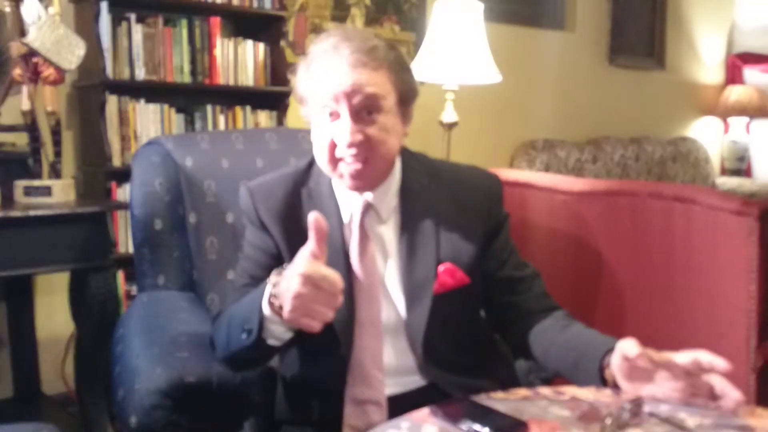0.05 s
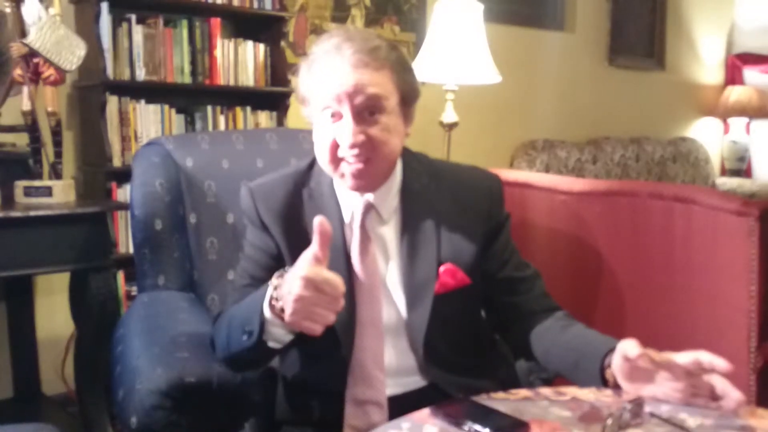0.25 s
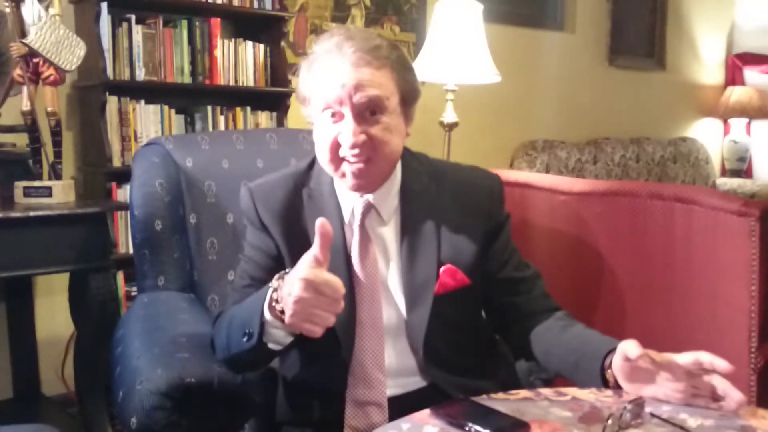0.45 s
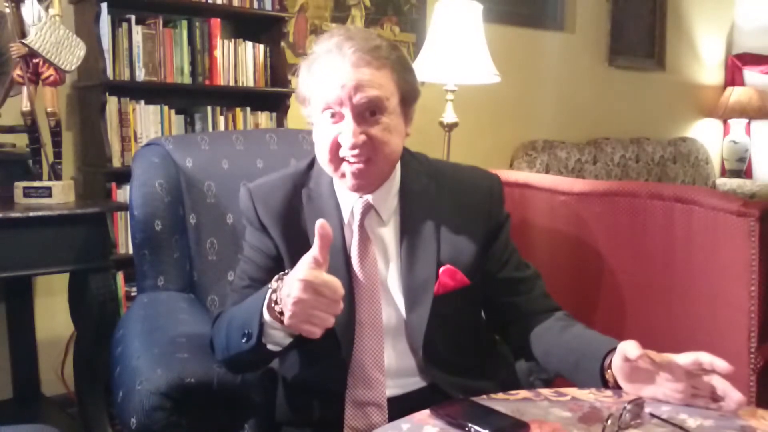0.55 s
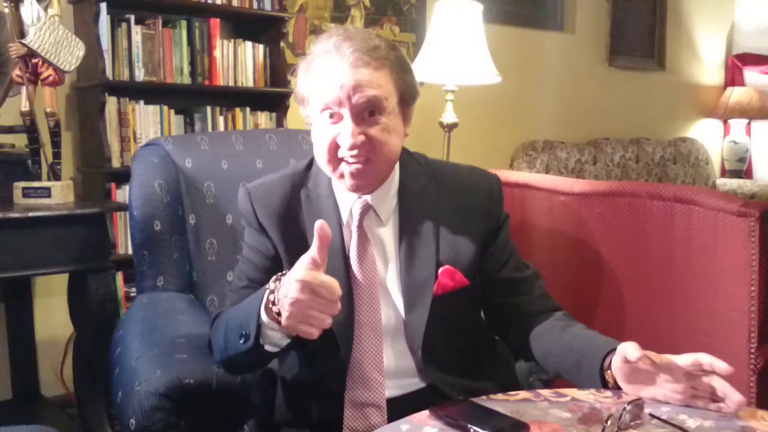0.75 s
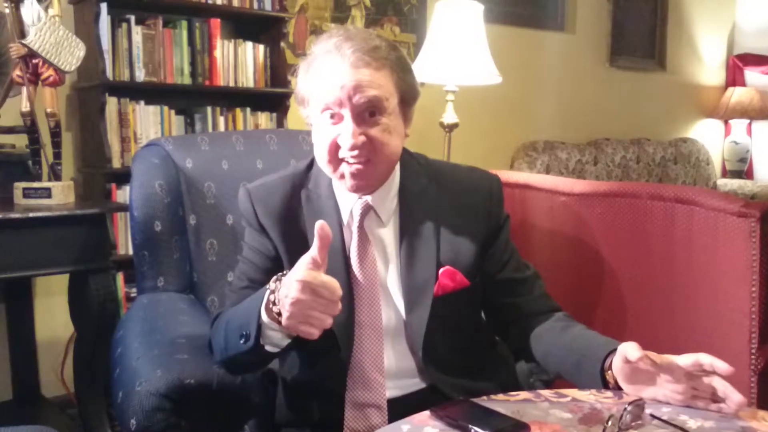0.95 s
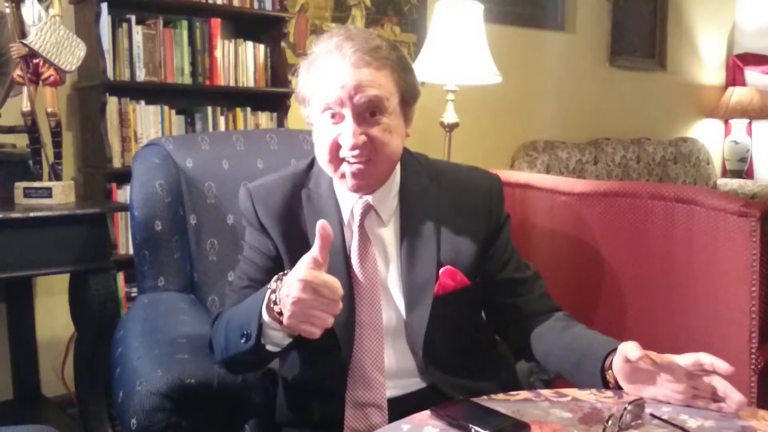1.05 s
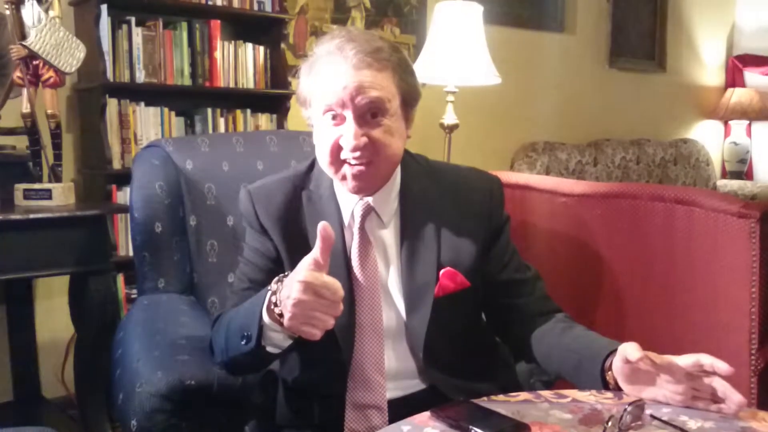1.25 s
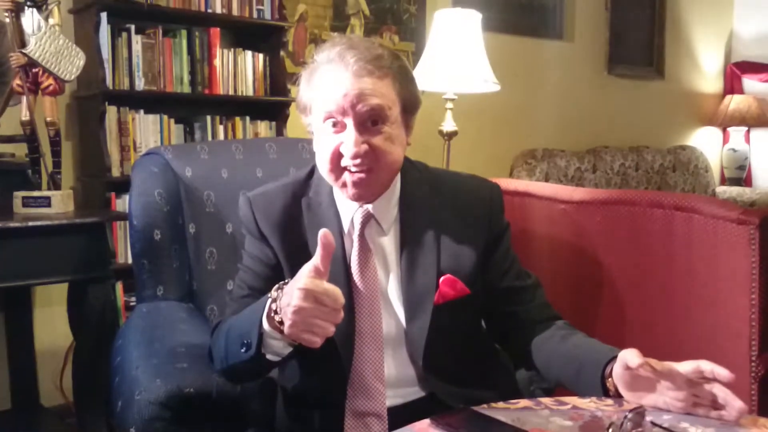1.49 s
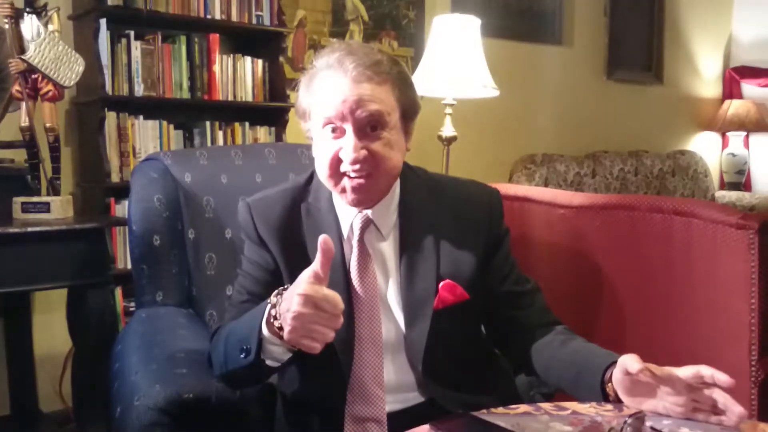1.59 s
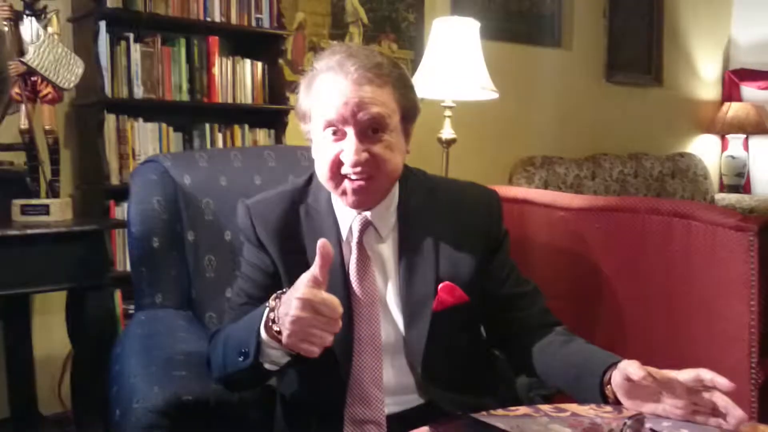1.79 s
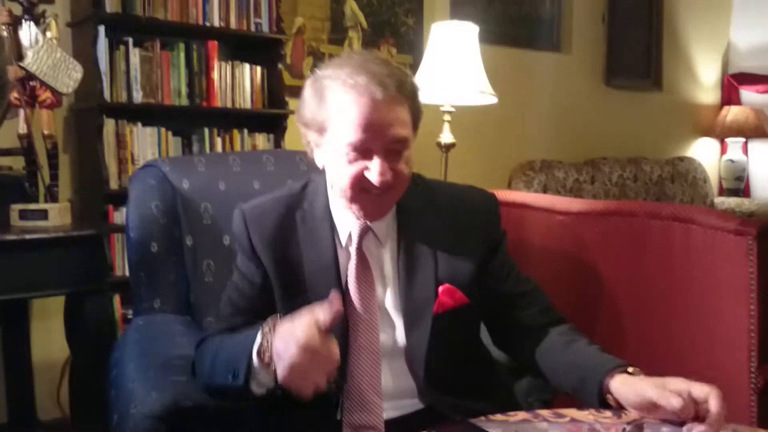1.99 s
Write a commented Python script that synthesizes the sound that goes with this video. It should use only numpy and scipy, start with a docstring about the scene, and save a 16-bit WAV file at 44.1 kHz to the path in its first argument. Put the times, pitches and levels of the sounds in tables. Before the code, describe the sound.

A mobile phone vibrates twice on a cloth-covered table after a moment of quiet room hiss. Each short buzz is a deep hum with a fine rattle, spinning up and winding down, heard very close.

```python
"""A phone's vibration motor buzzes twice on a cloth-covered table, heard from right at the case.
Its off-centre weight is a rotating unbalance that spins up and coasts down. It forces a deep hum,
mostly on the left, and a rattle of two knocks a turn, mostly on the right, whose overtones glide with
the speed. The case chafes as it shakes and clicks at starts and stops. Underneath lie a low throb,
a rumble and the hiss of a quiet room, with a faint rustle and two ticks before the first buzz."""
import sys
import numpy as np
from scipy import signal
from scipy.fft import rfft, irfft, next_fast_len
from scipy.io import wavfile
from scipy.ndimage import map_coordinates

SR = 44100
rng = np.random.default_rng(int(sys.argv[2]) if len(sys.argv) > 2 else 0)


def unload_wav(signal):
    """Save mono or channel-first audio to the path in sys.argv[1] as 16-bit WAV at rate SR, clipped to [-1, 1]."""
    wavfile.write(
        sys.argv[1],
        SR,
        np.round(np.clip(np.atleast_2d(signal).T, -1, 1) * 32767).astype(np.int16),
    )


N = 89478
CREEP_HZ = 8.6  # slow rise of the rotation rate, on top of the quick spin-up
FULL_SPEED_HZ = 169 + CREEP_HZ


def amp(db):
    """The decibel scale: amplitude grows tenfold every 20 dB."""
    return 10 ** (np.asarray(db) / 20)


def unit(x):
    """Normalisation to an rms of 1."""
    return x / np.sqrt(np.mean(x ** 2) + 1e-20)


def along(points, hz):
    """Interpolation of (frequency [Hz], value) points on a logarithmic frequency axis."""
    knots, values = np.transpose(points)
    return np.interp(np.log(hz + 1), np.log(knots + 1), values)


def curves(rows):
    """Linear interpolation in time: one value per sample for each column after the first."""
    times, *columns = np.transpose(rows)
    return [np.interp(np.arange(N) / SR, times, column) for column in columns]


def filtered(x, response):
    """Linear filtering: the spectrum of x is multiplied by a frequency response."""
    size = next_fast_len(N + 8192)
    return irfft(rfft(x, size) * response(np.fft.rfftfreq(size, 1 / SR)), size)[..., :N]


def noise(spectrum):
    """Spectral shaping turns white noise into coloured noise of rms 1."""
    return unit(filtered(rng.standard_normal(N), lambda hz: amp(along(spectrum, hz))))


def shaped(x, spectrum, size=4096):
    """Minimum-phase filtering: the overtones of x are weighted by this magnitude spectrum."""
    cepstrum = irfft(np.log(amp(along(spectrum, np.fft.rfftfreq(size, 1 / SR)))))
    cepstrum[1:size // 2] *= 2  # folding the cepstrum makes the filter causal
    cepstrum[size // 2 + 1:] = 0
    kernel = irfft(np.exp(rfft(cepstrum)))
    return signal.fftconvolve(x, kernel)[:N]


def pulses(times, sizes, half_width=8):
    """Band-limited impulses: a windowed sinc lets each fall between samples."""
    at = times[:, None] * SR
    index = at.astype(int) + np.arange(1 - half_width, half_width + 1)
    shape = np.sinc(index - at) * np.cos(np.pi * (index - at) / (2 * half_width)) ** 2
    return np.bincount(np.clip(index, 0, N).ravel(), (sizes[:, None] * shape).ravel(), N + 1)[:N]


def snaps(rows, t60, octaves, size=2048):
    """Damped transients: noise bursts, each around its own pitch, fall 60 dB in t60 seconds."""
    out, t, hz = np.zeros(N + size), np.arange(size) / SR, np.fft.rfftfreq(size, 1 / SR)
    attack = 1 - np.exp(-t / .0003)
    for start, db, centre in rows:
        colour = 1 / (1 + (hz / centre) ** 8) / (1 + (np.log2((hz + 1) / centre) / octaves) ** 2)
        burst = unit(irfft(rfft(rng.standard_normal(size)) * colour))
        out[round(start * SR):][:size] += amp(db - 60 * t / t60) * burst * attack / 2
    return out[:N]


def room(x, t60=.18):
    """Reverberation: a diffuse tail decays exponentially on each side."""
    t = np.arange(SR // 3) / SR
    tail = rng.standard_normal((2, len(t))) * amp(-60 * t / t60)
    return signal.fftconvolve(x[None], tail / np.linalg.norm(tail[0]), axes=1)[:, :N]


def hiss():
    """The room's noise floor: stationary noise, uncorrelated between the sides."""
    # noise spectrum on each side (frequency [Hz], relative density [dB])
    left = [(20, -12), (45, -25), (68, 7.5), (110, -13.5), (300, -9), (650, -6.5), (1900, -8),
            (3000, -13.5), (4700, -20), (7300, -12.5), (11200, -25), (15000, -22)]
    right = [(20, -3), (45, -2.5), (68, 6.5), (110, -8), (300, -5.5), (650, -3), (1900, -2.5), (3800, -7),
             (4700, -16.5), (7300, -15), (11200, -26), (15000, -20.5)]
    # rms levels (left [dB], right [dB])
    levels = [-63.5, -58.5]
    return np.array([amp(db) * noise(colour) for db, colour in zip(levels, (left, right))])


def rustle(centre_s=.36, width_s=.07, peak_db=-68.5):
    """Narrow-band noise swells and fades under a Gaussian envelope."""
    # noise band (frequency [Hz], relative density [dB])
    band = [(1500, -33), (1950, 3), (2500, -33)]
    swell = np.exp(-((np.arange(N) / SR - centre_s) / width_s) ** 2)
    return amp(peak_db) * swell * noise(band)


def ticks():
    """Two faint ticks, each a direct sound followed by its reverberation."""
    # transients in the room (time [s], level [dB], ring frequency [Hz])
    events = [(.1513, -43, 9400), (.1758, -46, 13900)]
    direct = snaps(events, t60=.012, octaves=1.4)
    return direct + amp(3) * room(direct)


def rumble(speed, fade_s=.45, sides_db=(-49.5, -44.5)):
    """Leaky integration: low noise builds up with the shaking and lingers after it."""
    # rumble spectrum (frequency [Hz], relative density [dB])
    spectrum = [(20, -36), (45, -5), (65, 12), (95, -5.5), (230, -9.5), (700, -17), (1100, -30.5),
                (4000, -26.5), (7000, -55)]
    pole = np.exp(-1 / (fade_s * SR))
    shaking = signal.lfilter([1 - pole], [1, -pole], speed)
    return np.array([amp(db) * shaking * noise(spectrum) for db in sides_db])


def throb(right_db=-12.5):
    """Amplitude and frequency modulation: a low tone swells and drifts, the sides in antiphase."""
    # course of the tone on the left (time [s], frequency [Hz], level [dB])
    course = [(1.11, 52, -64), (1.137, 52.3, -26.5), (1.16, 50.3, -33), (1.19, 45.9, -42.5),
              (1.35, 46.4, -34.5), (1.5, 47.2, -42.5), (1.61, 48.2, -39.5), (1.66, 50.38, -32),
              (1.71, 50.1, -58)]
    hz, level_db = curves(course)
    t = np.arange(N) / SR
    sounding = (t > course[0][0]) & (t < course[-1][0])
    tone = np.sqrt(2) * amp(level_db) * sounding * np.sin(2 * np.pi * np.cumsum(hz) / SR)
    return np.array([tone, -amp(right_db) * tone])


def clicks(left_db=-17):
    """Transient excitation: the case clicks as the weight starts and stops."""
    # clicks on the right (time [s], level [dB], ring frequency [Hz])
    events = [(.9572, -33, 2600), (1.3772, -34, 2800), (1.5462, -41, 3500), (1.5700, -31, 4800),
              (1.9412, -33, 5500), (1.9754, -25.5, 3800)]
    right = snaps(events, t60=.010, octaves=1.0)
    return np.array([amp(left_db) * right, right])


def chafe(turns, speed, depth=.22, sides_db=(-68, -58)):
    """Friction noise of the case, modulated once a turn and strongest somewhat below full speed."""
    # friction spectrum (frequency [Hz], relative density [dB])
    spectrum = [(200, -10), (450, -4), (750, 0), (1100, -6), (1900, 0), (3800, -2), (5000, -7), (8500, -12),
                (12000, -14), (15500, -20)]
    looseness = amp(16 * (1.5 - speed ** 4))
    stroke = looseness * speed ** 2.2 * (1 + depth * np.cos(2 * np.pi * turns))
    return np.array([amp(db) * stroke * noise(spectrum) for db in sides_db])


def disperse(x, spread_s=.0008, band_hz=450):
    """Dispersion: each band of a knock crosses the case with its own group delay."""
    knots = np.arange(0, SR / 2 + band_hz, band_hz)
    delay = spread_s * rng.standard_normal(len(knots))
    return filtered(x, lambda hz: np.exp(-2j * np.pi * np.cumsum(np.interp(hz, knots, delay)) * hz[1]))


def knocks(turns, speed, offset, level_db=-1, scatter_db=.2):
    """An impact train, one knock a turn, timed as at full speed; its jitter grows at lower speeds."""
    turn = np.arange(1, int(turns[-1]) + 1) + offset
    slack = 1 - np.interp(turn, turns, speed)
    lateness, strength = rng.standard_normal((len(turn), 2)).T
    jitter_s = 1e-6 + 1e-4 * slack ** 2
    return pulses(turn / FULL_SPEED_HZ + jitter_s * lateness, amp(level_db + scatter_db * strength))


def brighten(x):
    """Time-varying equalisation: the treble is duller in the first buzz than in the second."""
    # gain at the peak of the treble band (time [s], level [dB])
    gain = [(1.05, -4.5), (1.29, -1), (1.65, 0.5), (1.88, 0.5)]
    # shape of that band (frequency [Hz], share [0-1])
    band = [(3800, 0.1), (4400, 1), (8200, 0.23), (10000, 0)]
    level_db, = curves(gain)
    return x + (amp(level_db) - 1) * filtered(x, lambda hz: along(band, hz))


def rattle(turns, speed, return_turn=.59):
    """Periodic impacts, two a turn, form a harmonic series that glides with the motor's speed."""
    # overtone strengths on each side at full speed (frequency [Hz], relative level [dB])
    overtones_left = [(170, -28), (360, -4.5), (710, -21.5), (1070, -21), (1240, -19.5), (1420, -21),
                      (1600, -45), (1950, -12), (2130, -27), (2660, -28), (2840, -19), (3910, -48),
                      (4080, -31), (4260, -52), (4620, -17), (4970, -35), (5150, -37), (6220, -14),
                      (7460, -15), (8350, -22.5), (15810, -44)]
    overtones_right = [(170, -23.5), (360, -12), (530, -8.5), (710, -2.5), (890, -7.5), (1070, -5.5),
                       (1240, -15), (1420, 0), (1600, 3), (1780, -2.5), (1950, 5.5), (2310, -0.5),
                       (2490, -12.5), (2660, -13.5), (2840, 0.5), (3200, -6.5), (3730, -2), (4440, -8.5),
                       (4800, -14), (4970, -3.5), (5150, -13), (5680, -13), (6040, -6), (6220, -8.5),
                       (7460, -14.5), (7810, -29), (8170, -11), (8880, -34), (9410, -22), (9770, -35),
                       (10480, -13.5), (10830, -34), (11010, -8.5), (11370, -31), (11720, -14.5),
                       (12610, -25), (12790, -17.5), (14740, -34), (15810, -28)]
    # the brighter return knock relative to the first knock (frequency [Hz], gain [dB])
    return_colour = [(300, -8), (2200, -8), (3000, 1), (4300, 1), (5200, -8), (11000, -12)]
    back = filtered(knocks(turns, speed, return_turn), lambda hz: amp(along(return_colour, hz)))
    blows = disperse(knocks(turns, speed, 0) + back)
    place = turns * SR / FULL_SPEED_HZ  # the whole waveform stretches as the motor slows
    sides = [map_coordinates(shaped(blows, overtones), [place], order=5)
             for overtones in (overtones_left, overtones_right)]
    return speed ** 3.87 * np.array(sides)


def hum(turns, speed, right_db=-22):
    """Forced vibration: the unbalance swings the whole phone once a turn, the sides in antiphase."""
    # hum on the left, as it would be at full speed (time [s], level [dB])
    envelope = [(.96, -30.5), (1.0, -27), (1.05, -24), (1.1, -21), (1.2, -18), (1.29, -16), (1.6, -18.5),
                (1.7, -16.5), (1.8, -15), (1.9, -14.5)]
    level_db, = curves(envelope)
    swing = np.sqrt(2) * amp(level_db) * speed ** 2.81 * np.cos(2 * np.pi * turns)
    return np.array([swing, -amp(right_db) * swing])


def motor(spin_up_s=.024, creep_s=.11, coast_s=.05):
    """Exponential relaxation of the rotation rate [Hz]: a quick spin-up, a slow creep, then coasting."""
    # drive pulses (time on [s], time off [s], rate the quick spin-up tends to [Hz])
    buzzes = [(.957, 1.297, 169), (1.557, 1.897, 168.65)]
    t, rate = np.arange(N) / SR, np.zeros(N)
    for on, off, quick_hz in buzzes:
        driven_s = np.clip(t, on, off) - on
        spin_up = quick_hz * (1 - np.exp(-driven_s / spin_up_s))
        creep = CREEP_HZ * (1 - np.exp(-driven_s / creep_s))
        rate += (spin_up + creep) * np.exp(-np.maximum(t - off, 0) / coast_s)
    return rate


def scene():
    """Superposition: one motor drives the hum, rattle and chafing over the low sounds and the room."""
    rate = motor()
    turns = np.cumsum(rate) / SR
    speed = rate / FULL_SPEED_HZ
    case = clicks() + brighten(rattle(turns, speed)) + chafe(turns, speed)
    phone = hum(turns, speed) + case + amp(-28) * room(case.mean(0))
    return phone + throb() + rumble(speed) + hiss() + ticks() + rustle()


def record(dry, top_hz=15850):
    """Band limiting: an ideal low-pass filter removes the highest treble."""
    return filtered(dry, lambda hz: hz < top_hz)


dry = scene()
out = record(dry)
unload_wav(out)
```